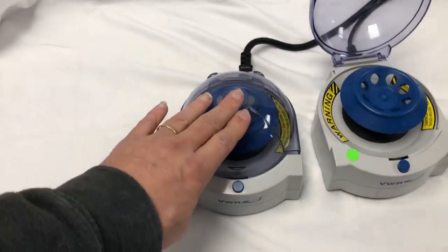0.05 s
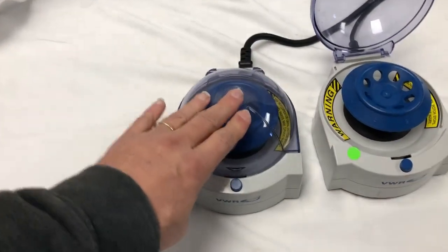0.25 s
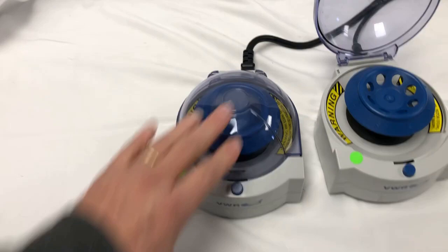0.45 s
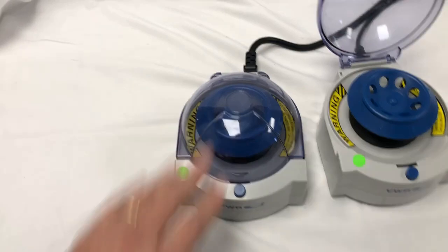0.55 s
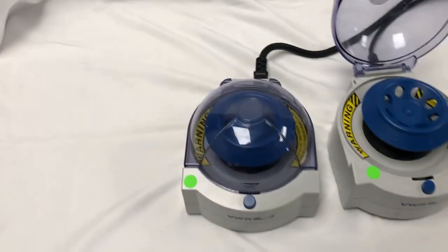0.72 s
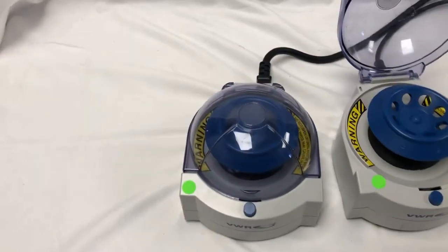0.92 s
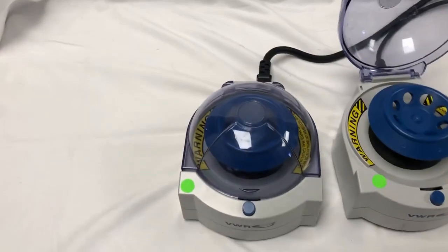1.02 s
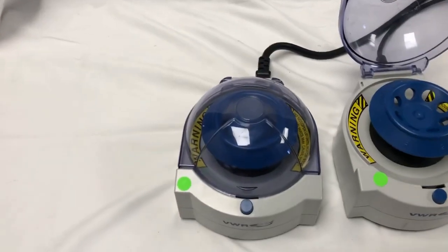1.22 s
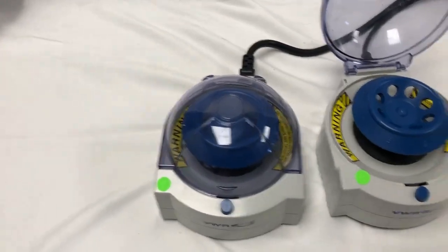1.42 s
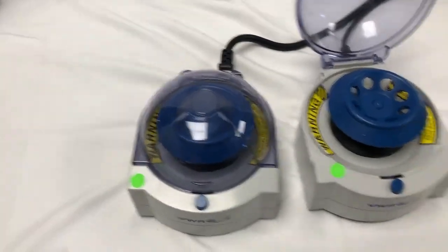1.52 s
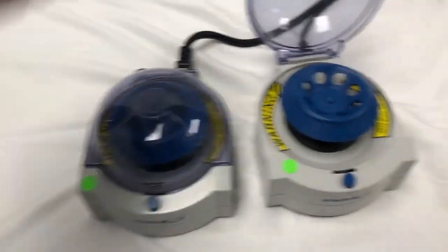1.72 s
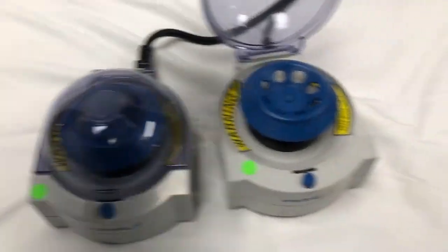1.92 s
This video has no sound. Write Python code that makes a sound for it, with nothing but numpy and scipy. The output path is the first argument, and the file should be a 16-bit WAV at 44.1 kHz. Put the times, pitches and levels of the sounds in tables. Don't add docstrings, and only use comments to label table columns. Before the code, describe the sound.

A small bench centrifuge is shut and spins up. Faint plastic creaks and ticks come first, then a hard, bright latch snap at 0.24 s with a boxy thump and short room rattle. The motor starts faintly beneath it; soft taps around 0.5 s mark the hand lifting. The fluttering, buzzing hum and brush hiss climb in pitch, clear by 1 s and loudest near 1.9 s. Close, mono, quiet hard room with faint ventilation.

```python
import sys
import numpy as np
from scipy import signal
from scipy.fft import irfft
from scipy.io import wavfile
from scipy.ndimage import uniform_filter1d

SR = 44100
rng = np.random.default_rng(int(sys.argv[2]) if len(sys.argv) > 2 else 0)


def volts(x):
    e = np.asarray(x, float) / 20
    return 10 ** e


def master_out(mix):
    frames = np.transpose(np.atleast_2d(mix))
    ceiling = np.clip(frames, -1, 1)
    pcm = np.round(ceiling * 32767).astype(np.int16)
    wavfile.write(sys.argv[1], SR, pcm)


N = 85995

# f/Hz, width/Hz, level/dB
HOUSING_MODES = [(230, 200, -1), (370, 150, 2), (560, 200, -1), (840, 230, -2), (1310, 170, -1),
                 (1780, 150, -9), (3000, 600, -12), (3850, 600, -2), (4520, 550, 0), (6000, 1300, -1.5),
                 (8200, 2000, -4), (9950, 380, 2), (11700, 2500, -3), (14500, 2600, -4)]
SLOTS = 3
START_S = .249


def level(x, db):
    return x * volts(db) / np.sqrt(np.mean(x ** 2))


def unit(x):
    return x / np.sqrt(np.mean(x[N // 2:] ** 2))


def band(x, hz, width):
    return signal.lfilter(*signal.iirpeak(min(hz, .45 * SR), hz / width, SR), x)


def double_band(x, hz, width):
    return band(band(x, hz, width), hz, width)


def walk(rate):
    hold = int(SR / rate)
    steps = np.repeat(rng.standard_normal(N // hold + 1), hold)
    return 1.34 * uniform_filter1d(uniform_filter1d(steps, hold), hold)[:N]


def air():
    # f/Hz, level/dB per Hz
    air_spectrum = [(18, -33), (30, -9.5), (546, -4), (1020, -30), (1820, -8), (2690, -31.5), (3320, -23),
                    (3680, -23), (15500, -32)]
    air_db, fade_in_s = -63, .026
    mains_hz, mains_db = 60, -66
    hz_points, db_points = np.array(air_spectrum).T
    vent = 0
    for hz in 35 * 2 ** np.arange(0, 9, .5):
        density_db = np.interp(np.log(hz), np.log(hz_points), db_points)
        db = density_db + 10 * np.log10(hz) + 0.84 * walk(9.1)
        vent = vent + volts(db) * level(double_band(rng.standard_normal(N), hz, hz / 2), 0)
    mains = level(band(rng.standard_normal(N), mains_hz, 5.6), mains_db)
    return (level(vent, air_db) + mains) * np.clip(np.arange(N) / SR / fade_in_s, .1, 1)


def rings(modes, chance, pitch_hz=None, size=8192):
    focus_db = -12
    t = np.arange(size) / SR
    out = 0
    for (hz, db, t60), c in zip(modes, chance):
        off_db = 0 if pitch_hz is None else focus_db * abs(np.log2(hz / pitch_hz))
        tone = np.sin(2 * np.pi * hz * (1 + .004 * c) * t)
        out = out + volts(db + off_db + 2 * c) * tone * 1000. ** (-t / t60)
    return out


def lid():
    # f/Hz, level/dB, t60/s
    shell_modes = [(160, -8, .07), (290, -1, .04), (400, 0, .04), (497, 0, .05), (632, 1, .05),
                   (870, -2, .04), (1200, -6, .03)]
    # f/Hz, level/dB, t60/s
    latch_modes = [(1480, -4, .018), (1820, -3, .04), (2050, -5, .02), (3030, -1, .035), (3550, -4, .018),
                   (4150, -7, .015)]
    # t/s, crack level/dB, latch level/dB, shell level/dB, shell f/Hz
    touches = [(.023, -52.5, -54, -71, 510), (0.051, -39.5, -46, -71, 463), (.053, -44, -55, -35, 520),
               (.101, -46, -34, -23, 640), (.130, -37, -48, -65, 650), (.184, -45, -55, -63, 504),
               (.213, -49, -56, -52, 520), (0.216, -45, -44, -50.5, 506), (.226, -52.5, -40, -39.5, 510),
               (.2355, -6.5, -9, -21, 800), (.243, -30, -30, -19, 560), (.253, -28, -30, -11, 380),
               (0.474, -50, -58, -41, 480), (0.483, -43, -39.5, -42.5, 500), (0.493, -40, -63.5, -43, 385),
               (.511, -50, -42, -33, 1100), (.514, -43, -44, -25, 410), (.612, -66, -74.5, -49, 1210)]
    crack_low_hz, crack_s, crack_fade = 2400, .0049, .3
    size = 8192
    out = np.zeros(N + size)
    t = np.arange(size) / SR
    bright = signal.butter(1, crack_low_hz, "high", fs=SR)
    cutoff = 1 + np.exp(np.minimum((t - crack_s) / (crack_fade * crack_s), 50))
    shape = np.exp(-t / (4 * crack_s)) / cutoff
    for s, crack_db, latch_db, shell_db, pitch_hz in touches:
        chance = rng.standard_normal((2, 8))
        crack = signal.lfilter(*bright, rng.standard_normal(size) * shape)
        latch = rings(latch_modes, chance[0]) / 2
        shell = rings(shell_modes, chance[1], pitch_hz) * np.minimum(t / .0015, 1)
        start = int(s * SR)
        out[start:start + size] += volts(crack_db) * crack + volts(latch_db) * latch + volts(shell_db) * shell
    return out[:N]


def tail():
    # f/Hz, t60/s, level/dB
    room_bands = [(86.4, 0.1, -4), (173, 0.41, -3), (271, 0.31, -3.5), (562, 0.25, -1.5), (998, 0.2, 0),
                  (2150, 0.21, 0), (3700, 0.24, 1.5), (7700, .25, -17.5), (13200, 0.075, -12.5)]
    t = np.arange(SR // 2) / SR
    rise = 1 - np.exp(-(t / .01) ** 2)
    out = 0
    for hz, t60, db in room_bands:
        noise = double_band(rng.standard_normal(len(t)), hz, 0.77 * hz)
        out = out + level(noise * 1000. ** (-t / t60) * rise, db)
    return out / np.sqrt(np.sum(out ** 2))


def clatter():
    snap_s, clatter_db = .236, 6
    return np.pad(volts(clatter_db) * tail(), (int(snap_s * SR), N))[:N]


def housing(x):
    out = 0
    for k, (hz, width, db) in enumerate(HOUSING_MODES):
        out = out + (-1) ** k * volts(db) * double_band(x, hz, width)
    return unit(out)


def shaft_hum(turns, phase):
    # multiple of the shaft rate, level/dB
    hum_orders = [(1, -8), (2, -3), (3, 0), (4, -7), (5, -3), (6, -1), (7, -8), (8, -14), (9, -3),
                  (10, -15), (11, -13), (12, -16), (13, -15), (14, -15), (15, -6), (16, -13)]
    return sum(volts(db + walk(3.93)) * np.sin(2 * np.pi * (k * turns + phase[int(k)])) for k, db in hum_orders)


def commutator(turns, phase):
    slope_db = -3.5
    return sum(volts(slope_db * np.log2(k)) * np.sin(2 * np.pi * (SLOTS * k * turns + phase[SLOTS * k]))
               for k in range(3, 30, 2))


def brush_track(turns):
    scatter_db, slot_lift_db, finest, drift_hz = 3.5, 5, 150, 3
    order = np.arange(300)
    chance = rng.standard_normal((3, 2, 300))
    size = volts(scatter_db * chance[0] + slot_lift_db * (order % SLOTS == 0))
    size = size * (order > 16) / (1 + (order / finest) ** 4)
    tracks = irfft(size * np.exp(1j * np.arctan2(chance[1], chance[2])), 8192)
    place = np.arange(8193) / 8192
    wear = 2 * np.pi * drift_hz * np.cumsum(1 + .5 * walk(4)) / SR
    a, b = (np.interp(turns % 1, place, np.append(x, x[0])) for x in tracks)
    return a * np.cos(wear) + b * np.sin(wear)


def brush_gate(turns, t):
    depth, decay_turns, fade_s = .7, .4, 1.2
    pulse = 2 * np.exp(-(turns % 1) / decay_turns) - 1
    return 1 + depth * np.exp(-(t / fade_s) ** 2) * pulse


def motor():
    # t/s, level/dB
    run_up = [
        (.42, -66.5),
        (.55, -62.5),
        (.75, -55.5),
        (1.0, -53),
        (1.3, -48.5),
        (1.6, -49),
        (1.95, -45.5),
    ]
    start_db, top_turns_hz, run_up_s = -80, 113.5, .96
    hum_db, rattle_db, commutator_db = -7, -18.5, -14
    track_db, hiss_db, whine_db = -4, -5, -19.5
    tick_db, knock_db = -11, -19
    commutator_follow, hum_follow = .2, .75
    hand_off_s, hand_damp_db = .57, -6
    t = np.arange(N) / SR
    s, db = np.array([(START_S, start_db)] + list(run_up)).T
    load_db, top_db = np.interp(t, s, db), db.max()
    speed_hz = top_turns_hz * (1 - np.exp(-np.maximum(t - START_S, 0) / run_up_s))
    turns = np.cumsum(speed_hz) / SR
    phase = rng.random(100)
    gate = brush_gate(turns, t)

    hiss = signal.lfilter([1, -.9], 1, rng.standard_normal(N)) * gate
    rattle = band(rng.standard_normal(N), 370, 333) * gate
    whine = unit(band(hiss, 1756, 60))
    low = volts(hum_db) * housing(shaft_hum(turns, phase)) + volts(rattle_db) * housing(rattle)
    high = volts(track_db) * housing(brush_track(turns) * gate)
    high = high + volts(hiss_db) * housing(hiss) + volts(whine_db) * whine

    trips = np.diff(np.floor(turns), prepend=0) * volts(2 * walk(30))
    tick = sum(double_band(trips, hz, width) for hz, width, _ in HOUSING_MODES[7:9])
    high = high + volts(tick_db) * unit(tick)
    low = low + volts(knock_db) * housing(band(trips, 420, 450))

    hand = volts(hand_damp_db * np.clip((hand_off_s - t) / .084, 0, 1))
    bars = housing(commutator(turns, phase) * hand)
    bars = bars * volts(commutator_db + top_db + commutator_follow * (load_db - top_db))
    low = low * hand * volts(top_db + hum_follow * (load_db - top_db))
    return (high * volts(load_db) + bars + low) * np.clip((t - START_S) / .087, 0, 1)


def scene():
    wet_db, motor_wet_db = -17, 2
    quiet, hand, spin = air(), lid(), motor()
    room = volts(wet_db) * signal.fftconvolve(hand + volts(motor_wet_db) * spin, tail())[:N]
    mono = hand + spin + clatter() + room + quiet
    return np.array([mono, mono])


def low_pass(x):
    return signal.sosfilt(signal.butter(12, 17130, fs=SR, output="sos"), x)


def record(dry):
    top_hz = 15700
    cut = signal.sosfilt(signal.ellip(8, .2, 40, top_hz, fs=SR, output="sos"), dry)
    return low_pass(cut)


dry = scene()
out = record(dry)
master_out(out)
```